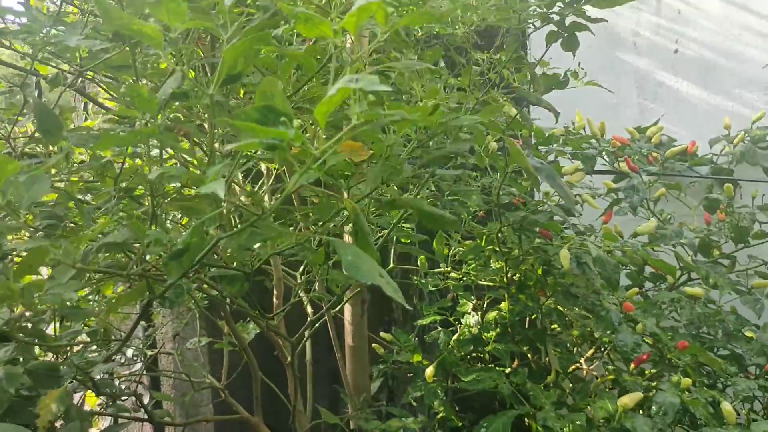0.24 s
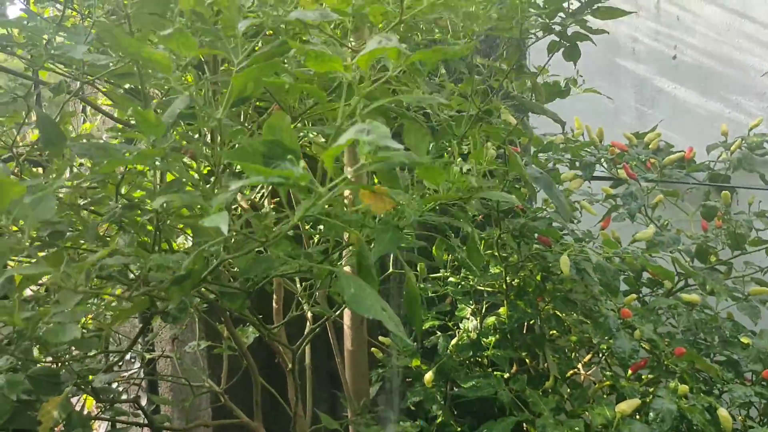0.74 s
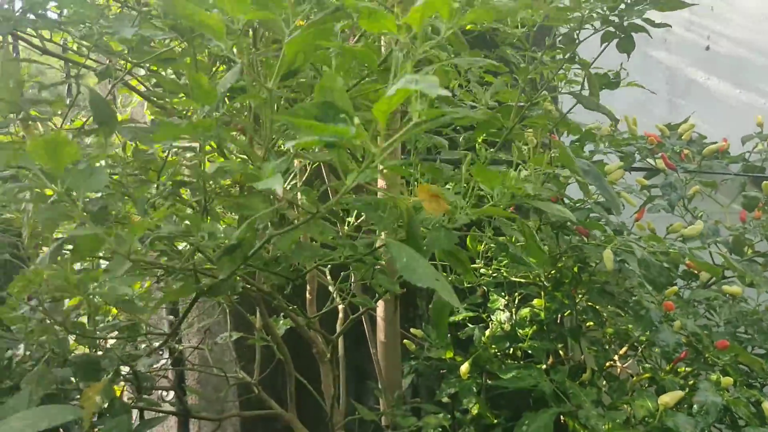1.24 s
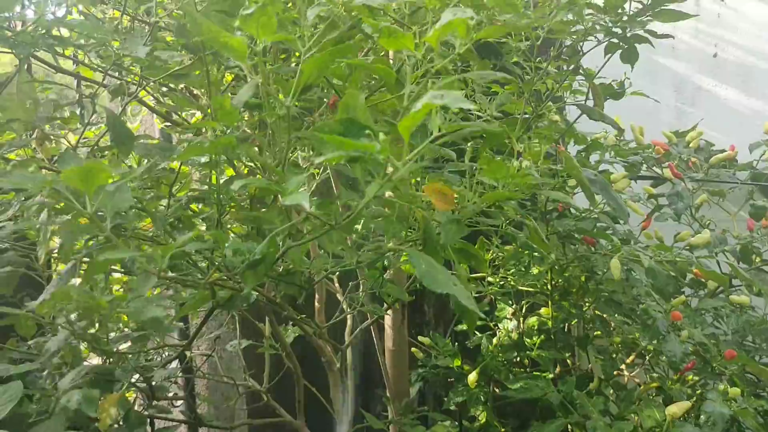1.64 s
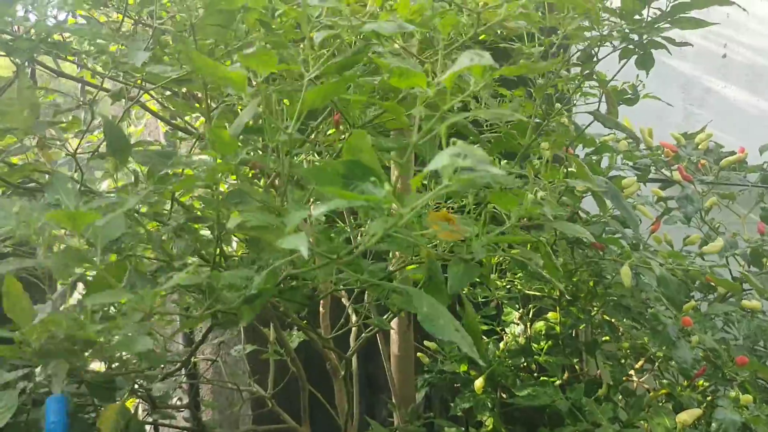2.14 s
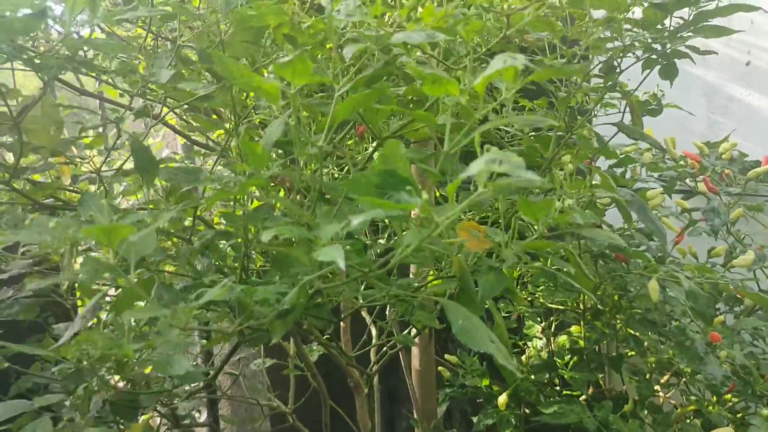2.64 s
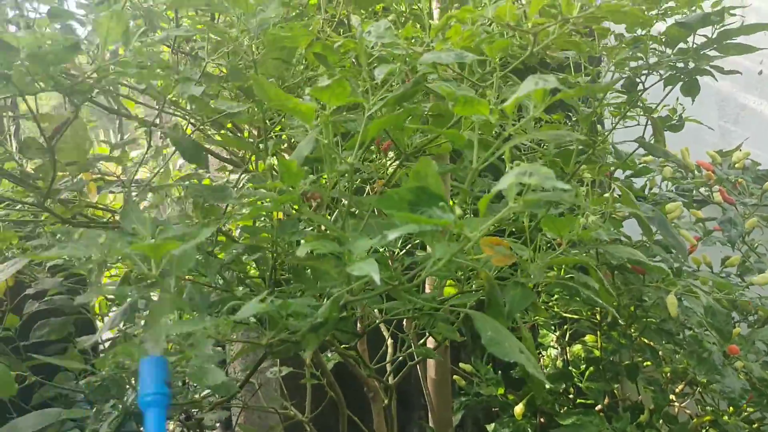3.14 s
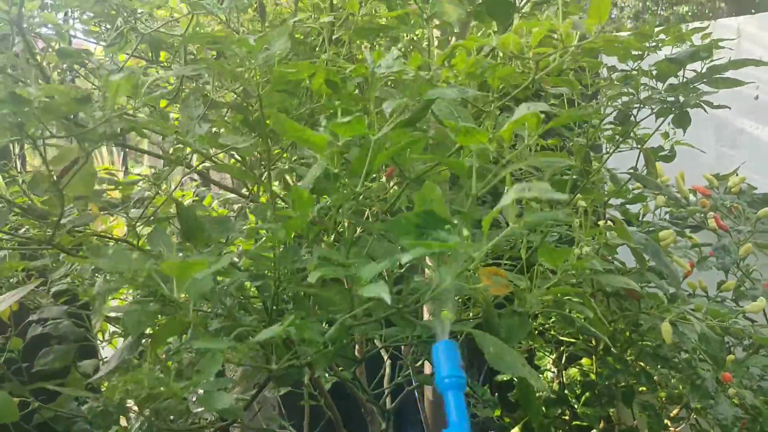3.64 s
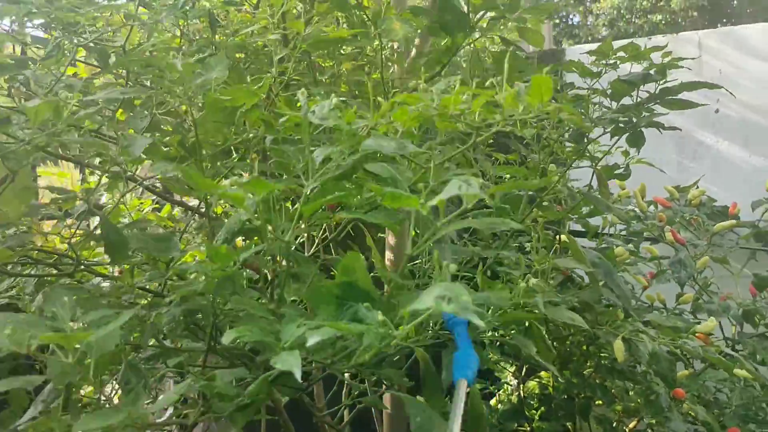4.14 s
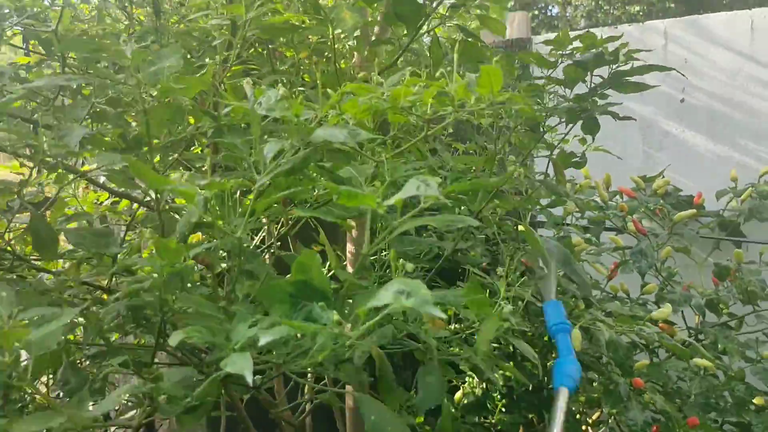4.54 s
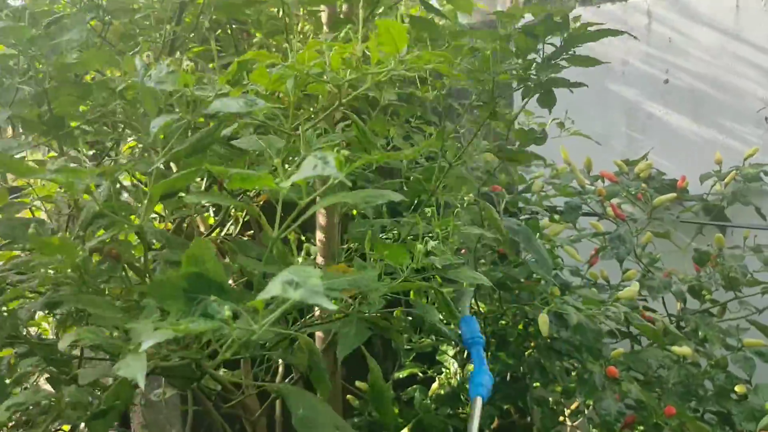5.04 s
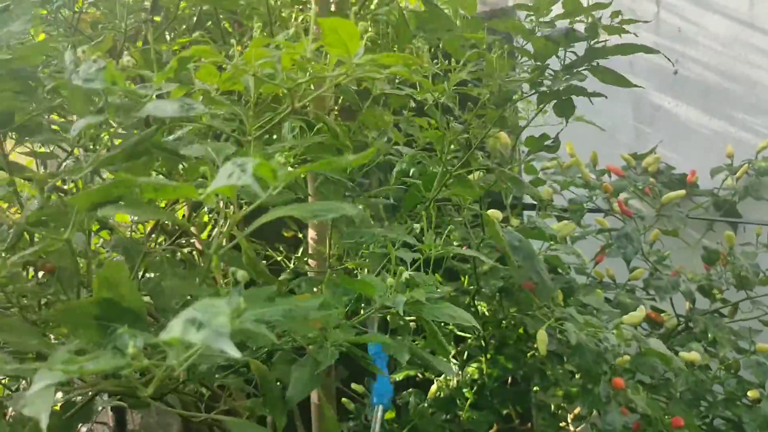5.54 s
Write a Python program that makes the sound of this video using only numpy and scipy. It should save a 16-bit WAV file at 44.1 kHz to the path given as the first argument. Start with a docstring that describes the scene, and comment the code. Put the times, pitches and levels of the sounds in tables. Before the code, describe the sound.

A steady, bright spray of fine water mist plays over leafy garden bushes for almost six seconds, heard close in stereo outdoors. It opens at its fizziest, with a few sharp fat-drop snaps in the first 0.2 seconds, and short bursts of patter as the jet crosses leaf clumps until about 0.8. Loose sheeting rumbles low from 0.25 to 0.9. A dull wand knock lands at 0.97, followed by a tiny rattle. Broad leaves drum softly around 1.8 to 2.2, with a faint low thud at 2.1. Light drips splat throughout, heavier ones around 2.5 to 2.8 and 3.35. From 3 seconds the nozzle's hollow ring is nearer, leaves flutter until about 4.2, and a thin, faint whistle sinks between 3.4 and 4.7. The fizz dips around 4.25 to 5, a soft rumble comes at 5.1, and brighter spray continues to the end. Quiet, dry air.

```python
"""A pump sprayer sweeps a cone of mist over garden bushes, close to a two-port microphone.
Random impacts, shaped by foliage, make fizz, patter and splash; ticks and high-passed hiss add grit and fine mist.
Fat drops snap as short bursts, leaves drum as gliding resonances, loose sheeting rumbles and drips splat.
The wand knocks, the nozzle rings hollowly and whistles faintly; low noise makes the still air."""
import sys
import numpy as np
from scipy import signal
from scipy.fft import rfft, irfft
from scipy.io import wavfile
from scipy.ndimage import uniform_filter1d, map_coordinates

SR = 44100
rng = np.random.default_rng(int(sys.argv[2]) if len(sys.argv) > 2 else 0)


def log_audio(samples):
    """Write samples as a 16-bit WAV file to the path given in sys.argv[1]."""
    # one column per channel
    frames = np.atleast_2d(samples).T
    # limit to full scale, then quantise
    limited = np.clip(frames, -1, 1)
    pcm = np.round(limited * 32767).astype(np.int16)
    wavfile.write(sys.argv[1], SR, pcm)


N = 255339
TIME = np.arange(N) / SR
HZ = np.fft.rfftfreq(N, 1 / SR)


def gain_of(db):
    """Decibels to an amplitude factor."""
    return 10 ** (np.asarray(db) / 20)


def evened(x):
    """Scales to an rms of one."""
    return x / np.sqrt(np.mean(x ** 2) + 1e-20)


def curves(rows):
    """Each column of a table, joined by straight lines in time."""
    s, *columns = np.transpose(rows)
    return [np.interp(TIME, s, column) for column in columns]


def coloured(x, rows):
    """Filters by a spectrum with one column of dB per channel."""
    hz, *columns = np.transpose(rows)
    db = np.array([np.interp(np.log(HZ + 1), np.log(hz), column) for column in columns])
    return irfft(rfft(x) * gain_of(db), N)


def above(x, hz, order):
    """High-pass without delay, half amplitude at hz."""
    return irfft(rfft(x) * (1 - 1 / (1 + (HZ / hz) ** order)), N)


def resonate(x, hz, width_hz):
    """A resonance that follows the curve hz: shift to zero, two one-pole passes, shift back."""
    turn = np.exp(2j * np.pi * np.cumsum(hz * np.ones(len(x))) / SR)
    r = np.exp(-np.pi * width_hz / SR)  # width of a single pass
    return (turn * signal.lfilter([(1 - r) ** 2], [1, -2 * r, r * r], x / turn + 1e-18)).real


def add(mix, start_s, sound):
    """Mixes a sound in at a time."""
    part = mix[max(round(start_s * SR), 0):][:len(sound)]
    part += sound[:len(part)]


def flicker(hz):
    """Smooth random curve of unit rms, low-passed at hz."""
    return evened(irfft(rfft(rng.standard_normal(N)) / (1 + (HZ / hz) ** 4), N))


def swells(rows, steepness=2.65):
    """Summed power of smooth swells: middle, length at half power, level."""
    power = 0
    for middle_s, length_s, db in rows:
        offset = abs(2 * (TIME - middle_s) / length_s)
        power = power + gain_of(db) ** 2 * .5 ** np.minimum(offset ** steepness, 60)
    return power


def stroke(t, length_s, rise_share=0.18):
    """The jet arrives quickly and slides off slowly; peak of one."""
    swell = (t / length_s) * np.exp(-(t / length_s / rise_share) ** 1.143 / 1.6)
    return swell / swell.max()


# where the spray lands: time_s, left_lag_samples
AIM = [(0, 1), (.55, 1), (1.0, 11), (1.42, 4), (1.75, 9.5), (2.6, 13.5), (3.1, 4.5), (3.7, 5.5),
       (4.45, -3.5), (5.2, 2.5), (5.79, 2.5)]


def aimed(x):
    """Path difference: the sound reaches the two ports a few samples apart."""
    lag, = curves(AIM)
    return np.array([map_coordinates(x, [np.arange(N) - side * lag / 2], order=3) for side in (1, -1)])


# steady spray on the bush as a whole: time_s, fizz_db, patter_db, splash_db
BUSH_LEVELS = [(0, -41.5, -45, -56), (.5, -44.5, -48, -56.5), (.68, -44, -47.5, -57.5),
               (1.1, -41.5, -47.5, -56.5), (1.68, -46, -53.5, -59), (1.88, -42.5, -46, -55.5),
               (2.12, -44, -52, -58.5), (2.5, -44.5, -51.5, -58.5), (2.87, -46.5, -50, -59.5),
               (3.05, -41.5, -47.5, -57.5), (3.85, -43, -50.5, -55.5), (4.25, -51, -49, -61),
               (4.8, -51, -50, -58), (5.2, -46, -49, -58), (5.38, -46, -50, -59), (5.79, -42, -48, -58.5)]
# jet crossing near clumps of leaves: middle_s, length_s, fizz_db, patter_db, splash_db
CLUMPS = [(0.091, 0.06, -37.5, -40.5, -61), (0.185, 0.055, -38.5, -52, -80),
          (0.368, 0.037, -42.5, -54, -58.5), (0.465, 0.071, -39.5, -43.5, -73),
          (0.547, 0.036, -41, -44.5, -62), (0.774, 0.03, -37.5, -58.5, -74), (1.193, 0.03, -47, -46.5, -67),
          (1.465, 0.27, -43.5, -45.5, -63), (1.552, 0.019, -44, -51, -68),
          (1.763, 0.084, -45.5, -47.5, -88), (1.982, 0.021, -38, -45.5, -70),
          (2.215, 0.11, -41.5, -47, -64), (2.434, 0.13, -44.5, -50.5, -82), (3.238, 0.11, -43, -59, -85),
          (3.543, 0.53, -74, -47.5, -84), (3.858, 0.12, -43, -46, -62), (4.143, 0.24, -44, -64, -63),
          (4.458, 0.27, -40.5, -49.5, -62), (4.705, 0.094, -40.5, -47, -64.5),
          (4.89, 0.12, -42.5, -47, -81), (4.939, 0.043, -45, -41, -58.5), (5.547, 0.037, -38, -44.5, -66),
          (5.704, 0.041, -41, -44.5, -67)]


def spray_levels():
    """Fizz, patter and splash in dB: powers of the whole bush and the crossed clumps add."""
    clumps = [swells([(s, length, dbs[k]) for s, length, *dbs in CLUMPS]) for k in range(3)]
    return [10 * np.log10(gain_of(db) ** 2 + power) for db, power in zip(curves(BUSH_LEVELS), clumps)]


def droplets(per_s, spread_db):
    """Random impacts with exponentially spread dB sizes; local power is held even."""
    size = gain_of(spread_db * np.minimum(rng.exponential(1, N), 4.5))
    hits = size * rng.choice([-1., 1.], N) * (rng.random(N) < per_s / SR)
    return hits / np.sqrt(uniform_filter1d(hits ** 2, size=1500) + 1e-9)


def foliage(x, lowest_hz, patchy_db=2.5, low_patchy_db=2.0, low_hz=1300, edge_order=14, leak_db=-20):
    """Leaves in the jet lend brief random resonances; little passes below their lowest pitch."""
    hz, t, z = signal.stft(x, SR, nperseg=1024, noverlap=768)
    patches = rng.standard_normal(z.shape[1:])
    patches = uniform_filter1d(patches, size=4, axis=0)  # across pitch
    patches = evened(uniform_filter1d(patches, size=11, axis=1))  # across time
    depth_db = patchy_db + low_patchy_db / (1 + (hz[:, None] / low_hz) ** 4)
    edge = 1 - 1 / (1 + (hz[:, None] / np.interp(t, TIME, lowest_hz)) ** edge_order)
    leak = gain_of(leak_db) * np.minimum(hz[:, None] / low_hz, 1)
    shaped = z * (edge + leak) * gain_of(depth_db * patches)
    return signal.istft(shaped, nperseg=1024, noverlap=768)[1][:, :N]


LEAF_HZ, LEAF_OCTAVES_PER_DB = 976, 0.39  # lowest pitch at median splash; more splash, lower pitch
LEFT_DB, LEFT_DB_PER_SAMPLE = -2.5, 0.13  # left over right; softer with more left lag
# colour of the spray at the ports: freq_hz, left_db, right_db
PORT_SPECTRA = [(1250, -8.5, -12), (1490, -8, -13), (1700, -4.5, -10), (2160, -6, -8), (2720, -2.5, -7.5),
                (4090, -3.5, -7), (5170, -9, -19), (5550, -5, -10.5), (6450, 2.7, -10), (7240, -2, -7),
                (7850, -6.5, -0.5), (9970, -9, -11.5), (11020, -7, -10.5), (13660, 6, -4.5),
                (16800, -7, -16)]


def spray(fizz_db, patter_db, splash_db, direct_share=0.23, sputter_db=0.43, coarsening=0.35, sway_db=0.9):
    """Impacts at the aim point plus scatter from the leaves around, levelled in three bands."""
    nearness_db = np.maximum(patter_db - np.median(patter_db), 0)  # near leaf: fatter drops
    direct = aimed(droplets(per_s=8000, spread_db=-1.5 + coarsening * nearness_db))
    scatter_spread_db = 1.84 + coarsening * nearness_db
    scatter = np.array([droplets(per_s=20000, spread_db=scatter_spread_db) for _ in range(2)])
    impacts = np.sqrt(direct_share) * direct + np.sqrt(1 - direct_share) * scatter
    lowest_hz = LEAF_HZ * 2 ** (-LEAF_OCTAVES_PER_DB * (splash_db - np.median(splash_db)))
    hits = foliage(coloured(impacts, PORT_SPECTRA), lowest_hz)
    splash = hits - above(hits, hz=1737, order=14)
    patter = hits - splash - above(hits, hz=5120, order=12)
    fizz = hits - splash - patter - above(hits, hz=10970, order=14)
    out = 0
    for band, db in ((fizz, fizz_db - .9), (patter, patter_db - .4), (splash, splash_db - 0.03)):
        out = out + gain_of(db + sputter_db * flicker(hz=40.0)) * band / band.mean(0).std()
    out = out * gain_of(sway_db * flicker(hz=23))  # small leaves sway in and out of the jet
    balance_db = LEFT_DB - LEFT_DB_PER_SAMPLE * curves(AIM)[0]
    return out * gain_of(np.array([balance_db, -balance_db]) / 2)


def grit(patter_db, count=24, db=-9, per_s=11, spread_db=-3.0, low_hz=1500, high_hz=9000, cycles=3, gust_db=2):
    """Coarse drops tick in flurries, each on a small leaf with a brief damped pitch; per_s is per pitch."""
    out, t = np.zeros((2, N)), TIME[:SR // 100]
    for hz in np.geomspace(low_hz, high_hz, count):
        tick = np.sin(2 * np.pi * hz * t) * np.exp(-hz * t / cycles)
        for when, size, side in rng.random((round(per_s * N / SR), 3)):
            level = gain_of(spread_db * min(-np.log(1 - size), np.pi))
            for port, share in zip(out, (side, 1 - side)):
                add(port, when * N / SR, level * np.sqrt(share) * tick)
    ticks = above(coloured(out, PORT_SPECTRA), hz=low_hz, order=8)
    return gain_of(patter_db + db) * evened(ticks * gain_of(gust_db * flicker(hz=9)))


def jet(fizz_db, db=-50, follow=0.48, waver_db=1.3):
    """The finest mist: smooth high noise that swells less than the fizz does."""
    hiss = above(coloured(rng.standard_normal((2, N)), PORT_SPECTRA), hz=9900, order=12)
    level_db = db + follow * (fizz_db - fizz_db.mean()) + waver_db * flicker(hz=24.5)
    return gain_of(level_db) * hiss / hiss.mean(0).std()


# fat drops on a near leaf, peak before filtering: start_s, peak_db
SNAPS = [(0.063, -18), (0.086, -23), (0.0964, -9), (0.194, -24), (1.295, -38), (1.9729, -41), (3.057, -30),
         (5.1647, -39), (5.5515, -29)]


def snaps(decay_s=0.0007, left_db=10, right_db=4):
    """Each fat drop bursts as noise that dies within a few milliseconds."""
    out, t = np.zeros(N), TIME[:SR // 100]
    for start_s, peak_db in SNAPS:
        burst = rng.standard_normal(len(t)) * np.exp(-t / decay_s)
        add(out, start_s, gain_of(peak_db) * burst / abs(burst).max())
    snap = above(out, hz=1530, order=9) - above(out, hz=8100, order=6)
    return coloured(snap, PORT_SPECTRA) * gain_of([[left_db], [right_db]])


# broad leaves drumming under the jet, level before path gains:
# start_s, length_s, level_db, first_hz, last_hz, width_share_of_pitch, overtones_db
LEAVES = [ (0.272, 0.25, -64, 570, 583, 0.7, -2), (1.019, 0.24, -61, 423, 400, 0.33, 11.5),
          (1.797, 0.2, -52.5, 604, 520, 0.15, 2), (1.866, 0.13, -51.5, 508, 427, 0.2, 4),
          (1.93, 0.26, -60.5, 350, 298, 0.29, 7), (1.954, 0.13, -49, 625, 640, 0.25, -1.5),
          (3.028, 0.53, -61, 745, 706, 0.19, -35), (3.371, 0.48, -60.5, 985, 900, 0.052, -10),
          (3.624, 0.22, -59, 317, 350, 0.17, -3), (3.821, 0.16, -55, 613, 414, 0.58, 1),
          (3.948, 0.33, -58.5, 707, 673, 0.093, -10), (4.106, 0.2, -66.5, 372, 382, 0.12, -5),
          (5.089, 0.12, -66.5, 600, 585, 0.18, 5)]
# modes of a struck leaf: pitch_multiple, level_db
LEAF_MODES = [(1, 2.5), (1.76, -2.5), (2.9, -5)]


def leaves(direct_db=-2.5, scatter_db=-1.5, scatter_hz=230, firm_width_share=0.28):
    """An uneven stream of drops drives a leaf's lowest modes, which glide as the jet slides along it."""
    out, t = np.zeros((3, N)), TIME[:SR]  # direct path, two scattered paths
    for start_s, length_s, db, first_hz, last_hz, width_share, overtones_db in LEAVES:
        hz = np.interp(t, [0, length_s], [first_hz, last_hz])
        swell = stroke(t, length_s)
        firmness = np.exp(-width_share / firm_width_share)  # narrow modes ring more steadily
        for k, (multiple, mode_db) in enumerate(LEAF_MODES):
            level = gain_of(db + mode_db + overtones_db * (k > 0)) * swell
            width_hz = width_share * multiple * first_hz
            for path in out:
                mode = resonate(rng.standard_normal(len(t)), multiple * hz, width_hz)
                mode = mode / (abs(signal.hilbert(mode)) + mode.std() / 2) ** firmness
                add(path, start_s, level * mode / np.sqrt(np.average(mode ** 2, weights=swell ** 2)))
    out = out * evened(gain_of(2.5 * flicker(hz=55)))
    scatter = above(out[1:], hz=scatter_hz, order=2)
    return gain_of(direct_db) * aimed(out[0]) + gain_of(scatter_db) * scatter


# loose sheeting under the spray: start_s, length_s, level_db, pitch_hz, width_share_of_pitch,
# flapping_re_level_db, flapping_top_hz
RUMBLES = [(0.249, 0.38, -49, 65.5, 0.14, -4, 159), (0.637, 0.3, -52.5, 67.4, 0.24, -4.5, 160),
           (1.024, 0.32, -68, 62.4, 0.36, 0.5, 190), (5.078, 0.26, -49.5, 151, 0.46, -4, 362),
           (5.665, 0.24, -60, 360, 0.28, 8.5, 410)]


def rumbles(low_share=0.27, uneven_db=1.2, scatter_db=-4, scatter_hz=240):
    """One slack mode of the sheet, with uneven flapping that stops sharply above a top pitch."""
    out, t = np.zeros((3, N)), TIME[:SR]  # direct path, two scattered paths
    for start_s, length_s, db, hz, width_share, flap_db, top_hz in RUMBLES:
        swell = stroke(t, length_s)
        for path in out:
            mode = resonate(rng.standard_normal(len(t)), hz, width_share * hz)
            mode = mode / np.sqrt(abs(signal.hilbert(mode)) + mode.std() / 2)
            noise = above(rng.standard_normal(N), hz=low_share * top_hz, order=2)
            flap = (noise - above(noise, hz=top_hz, order=14))[:len(t)]
            for part, part_db in ((mode, db), (flap, db + flap_db)):
                part = part / np.sqrt(np.average(part ** 2, weights=swell ** 2))
                add(path, start_s, gain_of(part_db) * swell * part)
    out = out * evened(gain_of(uneven_db * flicker(hz=35)))
    return aimed(out[0]) + gain_of(scatter_db) * above(out[1:], hz=scatter_hz, order=4)


# heavy drips from the bush onto a lower leaf: start_s, level_db, pitch_hz
HEAVY_DRIPS = [(1.275, -54.5, 320), (1.535, -54.5, 634), (2.494, -57.5, 795), (2.595, -58, 800),
               (2.644, -55, 580), (2.742, -57, 710), (2.839, -61, 695), (3.351, -51, 324),
               (4.471, -57, 714)]


def drips(count=110, db=-66, spread_db=3, low_hz=240, high_hz=1100, decay_s=0.012, rise_s=0.0046,
          overtone_db=-7, width_share=0.21):
    """Water splats on lower leaves, ringing damped modes: the heavy drips, and light ones at random."""
    out, t = np.zeros((2, N)), TIME[:SR // 12]
    light = [(when * N / SR, db + spread_db * (2 * size - 1), low_hz * (high_hz / low_hz) ** pitch)
             for when, size, pitch in rng.random((count, 3))]
    for start_s, level_db, hz in light + HEAVY_DRIPS:
        splat, ring = rng.standard_normal(len(t)), 0
        for k, (multiple, mode_db) in enumerate(LEAF_MODES):
            mode = evened(resonate(splat, multiple * hz, width_share * hz))
            ring = ring + gain_of(mode_db + overtone_db * (k > 0)) * mode * np.exp(-multiple * t / decay_s)
        ring = ring * (1 - np.exp(-t / rise_s))
        side = rng.random()
        for port, share in zip(out, (side, 1 - side)):
            add(port, start_s, gain_of(level_db) * np.sqrt(share) * ring)
    return out


# dull knocks and rattles of the wand: start_s, level_db, pitch_hz, t60_s
KNOCKS = [(0.974, -23.5, 410, 0.017), (0.986, -41, 340, 0.034), (1.003, -41.5, 426, 0.045),
          (2.131, -43.5, 96, 0.071)]


def knocks(tap_db=-19, tap_hz=1150, tap_s=0.0039, rise_s=0.0028):
    """Each knock: a crisp noise tap and one damped mode."""
    out, t = np.zeros(N), TIME[:SR // 8]
    for start_s, db, hz, t60_s in KNOCKS:
        ring = np.sin(2 * np.pi * hz * t) * gain_of(-60 * t / t60_s) * (1 - np.exp(-t / rise_s))
        tap = evened(resonate(rng.standard_normal(len(t)), tap_hz, tap_hz)) * np.exp(-t / tap_s)
        add(out, start_s, gain_of(db) * (ring + gain_of(tap_db) * tap))
    return aimed(out)


# hollow ring of the nozzle, louder once the wand is near: time_s, level_db
NOZZLE_LEVEL = [(0, -61), (2.8, -61.5), (3.05, -54.5), (4.3, -56), (5.79, -54)]
# resonances of the hollow nozzle and wand: freq_hz, width_hz, level_db
NOZZLE_MODES = [(707, 57, -19), (975, 37, -20), (1158, 120, -5.5), (1841, 274, 3.5)]


def nozzle(scatter_db=-6):
    """Turbulence excites the hollow nozzle and wand; the bush scatters some of the ring."""
    ring_db, = curves(NOZZLE_LEVEL)
    paths = np.zeros((3, N))  # direct path, two scattered paths
    for path in paths:
        for hz, width_hz, db in NOZZLE_MODES:
            path += gain_of(db) * evened(resonate(rng.standard_normal(N), hz, width_hz))
    return gain_of(ring_db) * evened(aimed(paths[0]) + gain_of(scatter_db) * paths[1:])


# faint whistle of the jet, mostly sinking as the wand turns: time_s, pitch_hz, right_level_db
WHISTLE = [(3.2, 9800, -90), (3.5, 9450, -56), (3.7, 9290, -51), (3.85, 9260, -51), (3.92, 9170, -47),
           (4.08, 9040, -51), (4.25, 8900, -70), (4.5, 8790, -49), (4.6, 8860, -52), (4.8, 8900, -80)]


def whistle():
    """The jet sheds one thin, wobbling tone, louder at the right port."""
    hz, db = curves(WHISTLE)
    wobble_hz, waver_db = 26 * flicker(hz=90), 3 * flicker(hz=70)
    tone = evened(np.sin(2 * np.pi * np.cumsum(hz + wobble_hz) / SR) * gain_of(waver_db))
    return gain_of(db) * tone * gain_of([[-5], [0]])


AIR_DB = -69.5  # rms
# spectrum shape of still garden air: freq_hz, relative_density_db
AIR_SPECTRUM = [(15, -24), (45, 7.5), (90, -3.5), (115, 7.5), (180, -5.5), (700, -14.5), (8000, -38)]


def air(side_db=-9):
    """A faint outdoor rumble: shared noise plus a little of each port's own."""
    noise = rng.standard_normal(N) + gain_of(side_db) * rng.standard_normal((2, N))
    return gain_of(AIR_DB) * evened(coloured(noise, AIR_SPECTRUM))


def scene():
    """All sources in the open air."""
    fizz_db, patter_db, splash_db = spray_levels()
    mist = spray(fizz_db, patter_db, splash_db) + grit(patter_db) + jet(fizz_db)
    struck = snaps() + leaves() + rumbles() + drips()
    return mist + struck + knocks() + nozzle() + whistle() + air()


EDGE_HZ = 15720


def record(dry):
    """The recorder's band limit: a steep linear-phase low-pass."""
    taps = signal.firwin(601, EDGE_HZ, window=("kaiser", 9), fs=SR)
    return signal.oaconvolve(dry, taps[None], "same")


dry = scene()
out = record(dry)
log_audio(out)
```